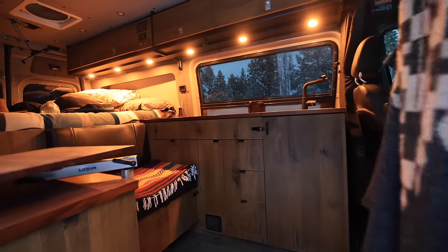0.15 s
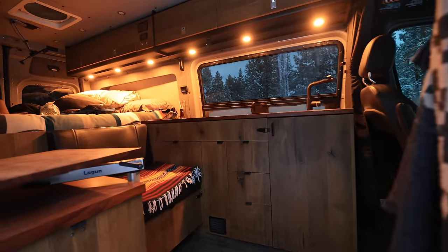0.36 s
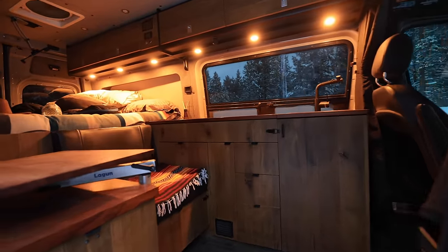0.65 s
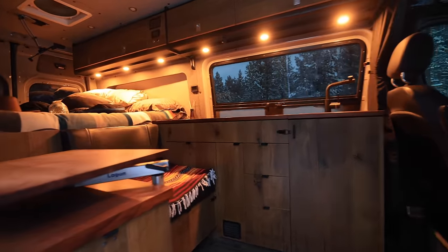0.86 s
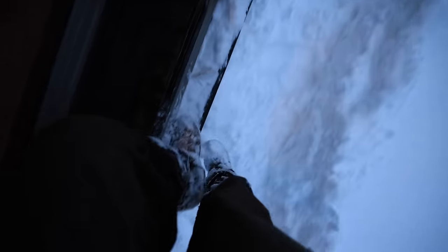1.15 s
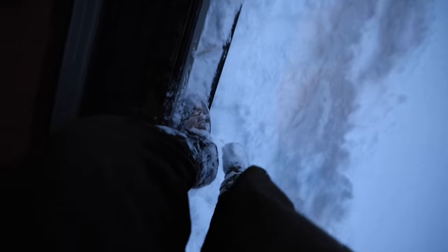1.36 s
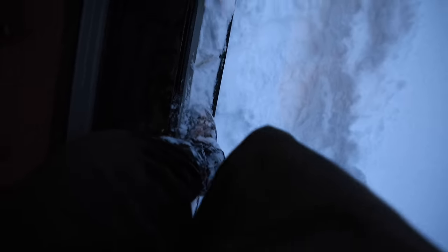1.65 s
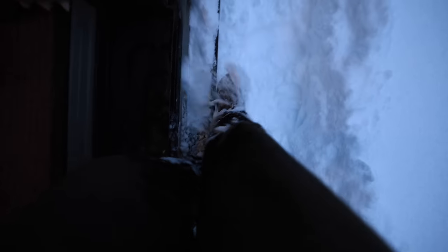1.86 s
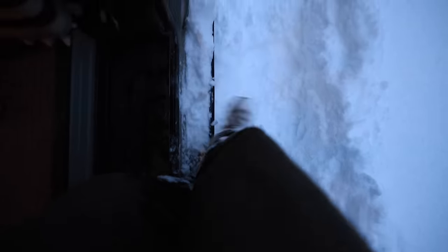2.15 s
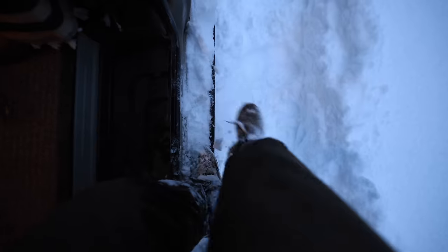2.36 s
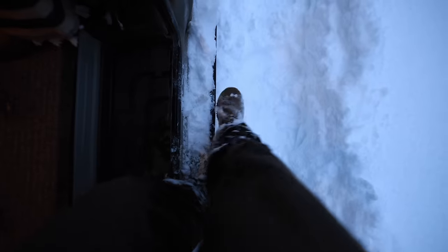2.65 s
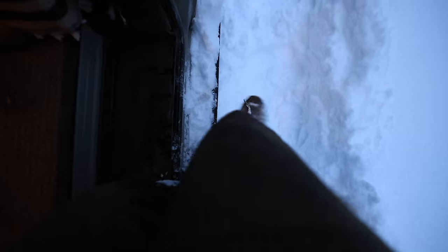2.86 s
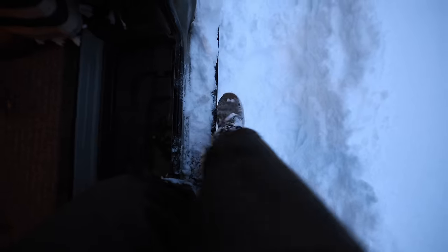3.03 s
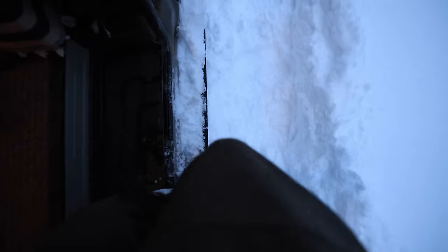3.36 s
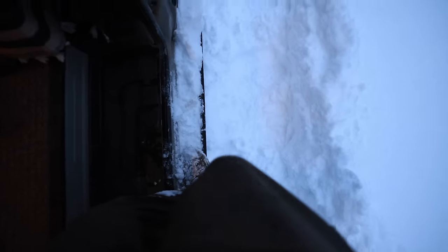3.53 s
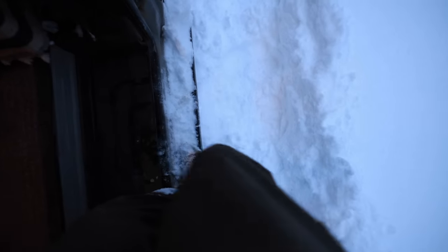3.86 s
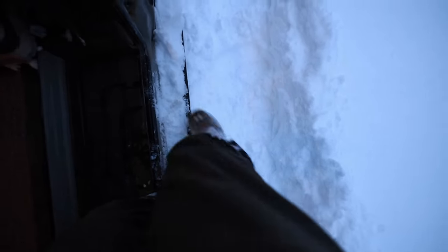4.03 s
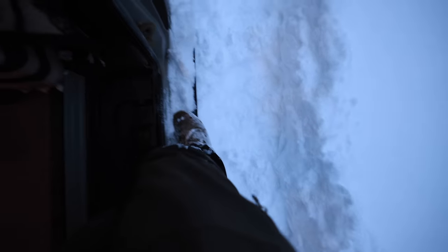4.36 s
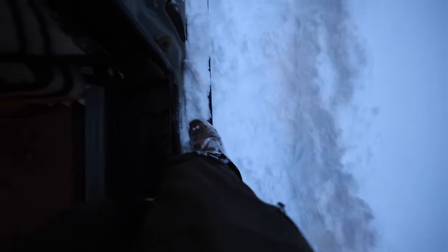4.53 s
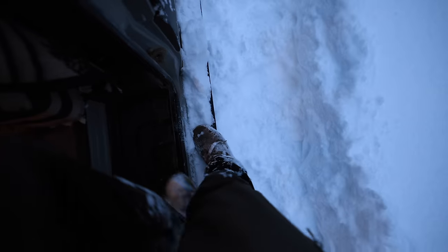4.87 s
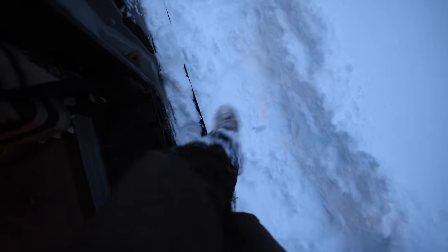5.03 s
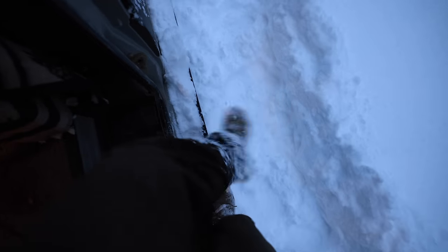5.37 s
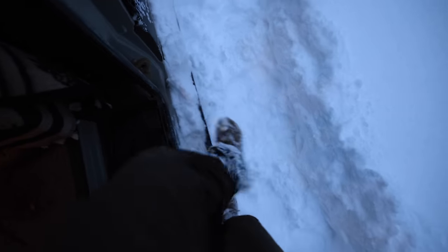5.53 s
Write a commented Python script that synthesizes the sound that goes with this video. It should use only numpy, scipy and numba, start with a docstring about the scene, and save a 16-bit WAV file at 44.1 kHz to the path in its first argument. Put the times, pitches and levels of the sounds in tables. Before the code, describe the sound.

The sound is close, in the open doorway of a quiet camper van. For the first 1.7 seconds stiff trousers rustle over a few soft, dull footfalls and faint low booms of the van body. At about 1.9, 2.2, 2.6 and 3.0 seconds a boot knocks hard against the hollow step, each blow a clack and a ringing thud with a little crunch of snow. The hardest knocks slightly overload the microphone and briefly duck everything else. Lighter footfalls land on the step around 3.5 to 3.7 seconds, then clunk on the cabin floor from 4.2 to 4.5. The other boot knocks twice, at 5.1 and 5.5 seconds. Trousers swish with each leg swing, and between blows come scattering snow crumbs, light taps on the trim and tiny tinkles of a zip pull. Low handling rumble and soft cabin air with a faint fan-like whine continue throughout.

```python
"""The open doorway of a camper van, heard from close by on the microphone of a hand-held camera.
Someone knocks a snowy boot against the step, steps up and knocks the other. Each blow rings the hollow
step or the cabin floor and crushes snow; stiff trousers swish with every swing of a leg. Behind them are
taps on the trim, a zip pull, soft booms of the van body, handling rumble and the air of the quiet cabin.
At this distance the hardest knocks overload the camera, and its limiter ducks everything for a moment."""
import sys
import numpy as np
from scipy import signal
from scipy.fft import rfft, irfft
from scipy.io import wavfile
from numba import njit

SR = 44100
rng = np.random.default_rng(int(sys.argv[2]) if len(sys.argv) > 2 else 0)


def wrap_up_sound(samples):
    """Save the sound to the file named by the first command line argument, as 16-bit audio."""
    columns = np.atleast_2d(samples).T
    # keep every value between -1 and 1, then stretch to whole-number steps
    tamed = np.clip(columns, -1, 1)
    steps = np.round(tamed * 32767).astype(np.int16)
    wavfile.write(sys.argv[1], SR, steps)


N = 251370
TIME = np.arange(N) / SR
AGE = TIME[:SR // 2]  # time since a blow, s

# Kicks against the step, close to the microphone; the lowest mode is stronger towards mid span:
# strike_s, sole_lead_s, sole_force_db, crunch_db, strike_force_db, lowest_mode_db,
# clack_lead_s, clack_db, low_clack_hz, high_clack_hz, high_over_low_db
KICKS = [(1.8582, 0.0039, -29, -33, 7, 2.5, 0.00037, 9, 805, 2200, 2),
         (2.2489, .0255, -6, -24, 5, 14, 0.0018, 1, 756, 2290, 0.5),
         (2.6226, .0318, 4, -18, 7.5, 9, 0.00053, 13, 807, 1940, -3),
         (2.9788, .0133, 5, -27, 2.5, -2.5, 0.00029, 0.5, 925, 1950, 4.5),
         (5.1099, 0.032, 0.5, -26, 0, -2, .0015, -11, 676, 2570, -4.5),
         (5.4685, 0.003, -6.5, -30, 7.5, 0.5, 0.00094, 2.5, 575, 2117, 4.5)]
def kick_contacts(sole_hz=139, edge_hz=750, slip_db=-14, slip_crunch_db=-5, edge_crunch_db=0.5):
    """The cushioned sole lands softly, slips and catches again halfway, and then the hard edge strikes."""
    contacts = []
    for strike_s, lead_s, sole_db, crunch_db, force_db, lowest_db, *_ in KICKS:
        bend_db = lowest_db + 0.5  # the flat sole bends the step more than the edge does
        touch = (strike_s - lead_s, sole_db, sole_hz, bend_db, crunch_db)
        catch = (strike_s - lead_s / 2, sole_db + slip_db, sole_hz, bend_db, crunch_db + slip_crunch_db)
        strike = (strike_s, force_db, edge_hz, lowest_db, crunch_db + edge_crunch_db)
        contacts += [touch, catch, strike]
    return contacts


# The stiff boot sole: pitch_hz, level_db, t60_s
SOLE_MODES = [(191, -10, 0.099), (355, -13, 0.05), (1070, -9, 0.012), (3110, -11, 0.011),
              (5110, -19, 0.0086), (7900, -34, 0.019)]
def sole_clacks(low_db=-2):
    """The sole thuds and clacks just before the step gives; the clack's colour depends on where it lands."""
    out = np.zeros(N)
    for strike_s, *_, lead_s, clack_db, low_hz, high_hz, high_over_low_db in KICKS:
        clack_modes = [(low_hz, low_db, .014), (high_hz, low_db + high_over_low_db, .008)]
        add(out, strike_s - lead_s, -undb(clack_db) * ring(SOLE_MODES + clack_modes, wave=np.sin))
    return out


# The hollow step in the doorway: pitch_hz, level_db, t60_s
STEP_MODES = [(105.8, -20, 0.19), (135.7, -3, 0.032), (188, -11.5, 0.065), (206.7, -20, 0.04),
              (235.7, -23.5, 0.42), (235.5, -21, 0.34), (252.7, -12, 0.23), (292, -44, 0.32),
              (332.4, -17, 0.13), (420, -33.5, 0.4), (530, -16.5, 0.061), (816, -10.5, 0.0057)]
# Footfalls on it: start_s, heel_force_db, contact_hz, lowest_mode_db, crunch_db
STEP_TREADS = [(0.415, -24.5, 200, -7, -61), (0.440, -23.5, 250, 25, -52), (0.546, -24, 400, -5, -59),
               (1.308, -28.5, 510, -8, -40), (1.626, -30.5, 486, 0, -38.5), (3.4502, -8.5, 760, 0, -24.5),
               (3.480, -14, 288, -10, -45), (3.6315, -15, 440, 3, -60), (3.6805, -6.5, 330, -10, -38.5),
               (3.712, -13, 230, -12, -39.5), (5.129, -1.5, 357, 13, -28.5)]
def door_step():
    """The hollow step rings under kicks and footfalls."""
    treads = footfalls(STEP_TREADS, lag_s=.006, weight_db=5.5, weight_hz=293, bend_db=-4.5, crush_db=-3)
    return blows(kick_contacts() + treads, STEP_MODES, panel_db=-9.5, panel_t60=0.19, crunch_t60=0.22,
                 low_hz=84, top_hz=2950)


# The cabin floor, just inside the door: pitch_hz, level_db, t60_s
FLOOR_MODES = [(94, -6, 0.1), (153, -39, .06), (231, -12.5, 0.18), (296.3, -11, 0.1), (339, -12, 0.032),
               (389, -13.5, 0.041), (510, -28, 0.037), (566, -15.5, 0.071), (710, -17.5, 0.081),
               (1125, -7.5, 0.03), (1545, -14.5, 0.03)]
# Footfalls on floor and sill: start_s, heel_force_db, contact_hz, lowest_mode_db, crunch_db
FLOOR_TREADS = [(0.110, -9, 333, -2, -51), (0.675, -25.5, 700, -15, -34.5), (1.025, -28.5, 700, -17, -36.5),
                (4.241, -12.5, 350, -1, -30.5), (4.289, -13, 503, -14, -27), (4.314, -10.5, 695, -16, -47),
                (4.3445, -9, 1160, -7.5, -31), (4.4551, 0, 1690, -8.5, -29), (4.4755, -7.5, 350, 3, -52)]
def cabin_floor():
    """The floor answers each footfall with a shorter ring than the step."""
    treads = footfalls(FLOOR_TREADS, lag_s=.0059, weight_db=-1.5, weight_hz=490, bend_db=-12, crush_db=-6)
    return blows(treads, FLOOR_MODES, panel_db=-2.5, panel_t60=0.022, crunch_t60=0.16,
                 low_hz=45, top_hz=1930)


def footfalls(treads, lag_s, weight_db, weight_hz, bend_db, crush_db):
    """Two contacts a tread: the heel touches, then the weight follows dully and crushes the snow again, more
    softly."""
    contacts = []
    for start_s, force_db, contact_hz, lowest_db, crunch_db in treads:
        heel = (start_s, force_db, contact_hz, lowest_db, crunch_db)
        weight = (start_s + lag_s, force_db + weight_db, weight_hz, lowest_db + bend_db, crunch_db + crush_db)
        contacts += [heel, weight]
    return contacts


# Dull spectrum of the panels round the doorway, also of flapping cloth: frequency_hz, density_db
DULL_SPECTRUM = [(70, -25), (110, 4.5), (250, 13), (400, -8.5), (700, -20), (1500, -38.5), (4000, -66)]
# Spectrum of snow crushed underfoot, also of snapping creases: frequency_hz, density_db
CRUNCH_SPECTRUM = [(300, 6), (1000, 4), (2200, -3.5), (3700, -9), (5000, -22.5), (8000, -29), (16000, -44)]
def blows(contacts, modes, panel_db, panel_t60, crunch_t60, low_hz, top_hz):
    """A boot pushes on a body: its modes and the panels round it ring while snow crumbles underfoot."""
    out = np.zeros(N)
    lowest, upper = ring(modes[:1]), ring(modes[1:])
    # the body is too small to radiate deep bass and too damped to carry treble
    bass_cut = signal.butter(2, low_hz, "highpass", fs=SR, output="sos")
    treble_cut = signal.butter(4, top_hz, fs=SR, output="sos")
    for start_s, force_db, contact_hz, lowest_db, crunch_db in contacts:
        panels = colour(rng.standard_normal(len(AGE)), DULL_SPECTRUM) * fade(panel_t60)
        body = undb(lowest_db) * lowest + upper + undb(panel_db) * panels
        # a softer contact pushes for longer and wakes only the low modes
        softness = signal.butter(2, contact_hz, fs=SR, output="sos")
        thud = signal.sosfilt(np.vstack([softness, bass_cut, treble_cut]), body)
        add(out, start_s, -undb(force_db) * thud)
        crunch = colour(grains(len(AGE), per_s=5200, spread_db=-1.0), CRUNCH_SPECTRUM)
        add(out, start_s, undb(crunch_db) * crunch * fade(crunch_t60))
    return out


# Snow coming off the boots: start_s, relative_level_db, t60_s
CRUMBS = [(1.6288, -29, 0.035), (2.1857, -35, 0.04), (2.3411, -48, 0.032), (2.3616, -33, 0.025),
          (2.8702, -29.5, 0.03), (2.8828, -31, 0.035), (3.68, -26.5, 0.05), (3.7311, -31.5, 0.035),
          (3.999, -36, 0.035), (4.0317, -31, 0.035), (5.5456, -23, 0.033), (5.6481, -33, 0.03)]
# Its icy spectrum: frequency_hz, density_db
CRUMB_SPECTRUM = [(300, 2), (1500, 10), (3500, 6), (7000, -7), (10000, -12.5), (16000, -28)]
def snow_crumbs(gain_db=-8):
    """Crumbs of snow break off and scatter in short bright bursts of grains."""
    out = np.zeros(N)
    for start_s, level_db, t60 in CRUMBS:
        grit = colour(grains(len(AGE), per_s=5200, spread_db=4.0), CRUMB_SPECTRUM)
        add(out, start_s, undb(level_db + gain_db) * grit * fade(t60))
    return out


# One trouser leg brushing the other, near the microphone; tight fabric hisses more:
# start_s, length_s, level_db, growth_db, extra_hiss_db
STROKES = [(0.0, 1.2, -43.5, -2.5, 4), (0.334, 0.24, -38.5, -11, -5.5), (0.537, 0.13, -37, -9.5, 1),
           (0.867, 0.038, -39, -9, 6), (0.928, 0.19, -39.5, -4.5, 1), (1.028, 0.071, -49, -7, 11),
           (1.752, 0.084, -30, 1.5, 3.5), (1.831, .04, -20.5, -1.5, 1.5), (2.044, 0.34, -49, 4, -3),
           (2.749, 0.027, -36.5, 4.5, -6), (3.233, .14, -31.5, -2.5, -0.5), (3.365, .19, -43, -9, 3.5),
           (4.235, 0.049, -42.5, -14, 7), (4.62, 0.146, -34.5, 1, 5), (4.781, 0.14, -31, -8.5, 5),
           (5.002, 0.013, -30.5, -5.5, -3.5), (5.069, 0.045, -28, 6, 5), (5.167, 0.052, -32, -5, 3.5),
           (5.238, 0.025, -27.5, 3.5, -3.5), (5.312, 0.36, -43, 1, -5.5)]
def leg_strokes(idle_db, idle_hiss_db=1, attack_s=0.054, release_s=0.017):
    """Level and extra hiss of the cloth in dB: a stroke sets in, follows the leg's speed and lets go."""
    power = np.full(N, undb(idle_db) ** 2)  # the cloth is never quite still
    weighted_hiss = power * idle_hiss_db
    for start_s, length_s, level_db, growth_db, hiss_db in STROKES:
        onset = np.interp(TIME, [start_s - attack_s / 2, start_s + attack_s / 2], [0, 1])
        release = np.exp(-np.maximum(TIME - start_s - length_s, 0) / release_s)
        progress = np.clip((TIME - start_s) / length_s, 0, 1)
        stroke_power = (onset * release * undb(level_db + growth_db * (progress - .5))) ** 2
        power += stroke_power
        weighted_hiss += stroke_power * hiss_db
    return 10 * np.log10(power), weighted_hiss / power


# Stiff fabric rubbing at close range: frequency_hz, density_db
CLOTH_SPECTRUM = [(80, -7.5), (160, -10), (400, 4.5), (800, -1), (1300, -1.5), (2000, -5), (2800, -8),
                  (3700, -10), (4800, -20), (8000, -27), (11000, -32.5), (16000, -34.5)]
def trousers(idle_db=-49.5, flutter_db=1.5, flap_db=-27, crease_db=-16, rasp_hz=1780, rasp_octaves=1.17):
    """Stiff fabric rubs in dense little slips; its folds shift the colour, flap dully and at times snap."""
    stroke_db, hiss_db = leg_strokes(idle_db)
    rub_db = stroke_db + flutter_db * drift(130)
    rasp_db = 0.1733 * (stroke_db - idle_db)  # the harder the stroke, the more it gathers in a rasp
    slips = colour(grains(N, per_s=9000, spread_db=-1.5), CLOTH_SPECTRUM)
    spectrum = rfft(slips)
    hz = np.maximum(np.fft.rfftfreq(N, 1 / SR), 1)
    swish = np.zeros(N)
    for centre_hz in 125 * 2 ** np.arange(0, 7.5, 1 / 3):  # third-octave bands
        triangle = np.maximum(1 - 3 * np.abs(np.log2(hz / centre_hz)), 0)
        band = irfft(spectrum * triangle, N)
        fold_db = (2.6 if centre_hz < 3000 else 1.6) * drift(40)
        rasp_shape = np.exp(-(np.log2(centre_hz / rasp_hz) / rasp_octaves) ** 2) - .5
        hiss_shape = min(centre_hz / 6000, 1)
        swish += band * undb(fold_db + rasp_db * rasp_shape + hiss_db * hiss_shape)
    creases = colour(grains(N, per_s=45, spread_db=2.5), CRUNCH_SPECTRUM)
    # the dull flapping grows more slowly with speed than the swish does
    flap = undb(flap_db + 0.79 * rub_db) * colour(rng.standard_normal(N), DULL_SPECTRUM)
    return undb(rub_db) * (swish + undb(crease_db) * creases) + flap


# A boot touching the trim: start_s, level_db
TRIM_TAPS = [(1.627, -29.5), (2.537, -35), (2.5612, -20), (2.9534, -18.5), (4.548, -24), (4.551, -22),
             (5.0, -30.5), (5.515, -37), (5.547, -30)]
# The trim panel: pitch_hz, level_db, t60_s
TRIM_MODES = [(412, -13, 0.036), (926, 2, 0.011), (1230, 4, 0.0055), (2240, -14.5, 0.034)]
def trim_taps():
    """The trim panel ticks under light taps of a boot."""
    return ticks(TRIM_TAPS, TRIM_MODES, vary_db=.7)


# Tinkles of a zip pull: start_s, level_db
ZIP_TINKLES = [(2.558, -42.5), (2.955, -46), (2.966, -34), (3.095, -58), (3.21, -55), (3.392, -40),
               (5.108, -26)]
# The pull itself: pitch_hz, level_db, t60_s
ZIP_MODES = [(5700, -27, 0.021), (7320, -0.5, 0.017), (9700, -5, 0.015), (10200, -15.5, 0.011),
             (11900, -20, 0.021)]
def zip_pull():
    """The small hard pull rings high and briefly."""
    return ticks(ZIP_TINKLES, ZIP_MODES, vary_db=2)


# Soft booms of the van as the weight shifts: middle_s, level_db, pitch_hz
BOOMS = [(0.01, -26, 60.3), (0.758, -26, 44.5), (0.87, -26, 51), (1.188, -29, 56.3), (2.119, -31, 54.3),
         (5.05, -30, 62)]
def van_booms(length_s=0.1287):
    """The van body swells for a few slow cycles under a shifting load."""
    out, t = np.zeros(N), TIME[:int(length_s * SR)]
    swell = np.sin(np.pi * t / length_s) ** 2
    for middle_s, level_db, pitch_hz in BOOMS:
        add(out, middle_s - length_s / 2, undb(level_db) * swell * np.sin(2 * np.pi * pitch_hz * t))
    return out


# Handling noise, right at the microphone: time_s, relative_level_db
RUMBLE_LEVELS = [(0.0, -38.5), (0.76, -38), (0.98, -43.5), (2.52, -45), (3.76, -48.5), (5.7, -41.5)]
# Its spectrum: frequency_hz, density_db
RUMBLE_SPECTRUM = [(15, -3), (32, -11.5), (52, 5), (75, -2), (110, -6.5), (200, -7), (600, -49)]
def handling(gain_db=3):
    """The camera rumbles low in the hand."""
    level_db = gain_db + np.interp(TIME, *np.transpose(RUMBLE_LEVELS))
    return undb(level_db) * colour(rng.standard_normal(N), RUMBLE_SPECTRUM, size=8192)


# Room tone of the cabin, in the background: frequency_hz, density_db
CABIN_SPECTRUM = [(25, -25), (55, -8), (110, -20), (250, -7.5), (500, -11), (1000, -13.5), (2000, -25),
                  (3600, -22.5), (5000, -33), (10000, -44), (16000, -50)]
def cabin_air(air_db=-48, swell_db=-6.5, whine_hz=752, whine_db=-54.5):
    """Quiet air swells and sinks behind a faint whine, as of a small fan."""
    air = unit(colour(rng.standard_normal(N), CABIN_SPECTRUM, size=8192))
    air *= undb(air_db + swell_db * drift(5.5))
    pitch_hz = whine_hz + 0.42 * drift(32)
    whine = np.sin(2 * np.pi * np.cumsum(pitch_hz) / SR)
    return air + undb(whine_db) * unit(whine)


def undb(db):
    """Decibels to gain."""
    return 10 ** (np.asarray(db) / 20)


def unit(x):
    """Scale to rms 1."""
    return x / np.sqrt(np.mean(x ** 2))


def add(out, start_s, x):
    """Mix x into out from start_s on."""
    i = int(round(start_s * SR))
    x, i = x[max(-i, 0):], max(i, 0)
    out[i:i + len(x)] += x[:len(out) - i]


def colour(x, points, size=2048):
    """Filter x by a causal response of unit energy, shaped by (frequency_hz, density_db) points."""
    hz, db = np.transpose(points)
    bins_hz = np.maximum(np.fft.rfftfreq(size, 1 / SR), 1)
    gain = undb(np.interp(np.log(bins_hz), np.log(hz), db))
    cepstrum = irfft(np.log(gain))
    cepstrum[1:size // 2] *= 2  # fold onto positive time for minimum phase
    cepstrum[size // 2 + 1:] = 0
    response = irfft(np.exp(rfft(cepstrum)))
    return signal.fftconvolve(x, response / np.linalg.norm(response))[:len(x)]


def fade(t60):
    """Exponential decay after a blow, by 60 dB in t60 seconds."""
    return np.exp(-np.log(1000) * AGE / t60)


def ring(modes, wave=np.cos):
    """Free vibration of a struck body."""
    return sum(undb(db) * fade(t60) * wave(2 * np.pi * hz * AGE) for hz, db, t60 in modes)


def ticks(hits, modes, vary_db):
    """Light hits on a hard object; each one wakes its modes in a different mix."""
    out = np.zeros(N)
    for start_s, level_db in hits:
        mix = [(hz, db + vary_db * rng.standard_normal(), t60) for hz, db, t60 in modes]
        add(out, start_s, undb(level_db) * ring(mix, wave=np.sin))
    return out


def drift(rate_hz):
    """Smooth random drift with a spread near 1."""
    knots = rng.standard_normal(N // 100)
    return np.interp(TIME * rate_hz, np.arange(len(knots)), knots)


def grains(size, per_s, spread_db):
    """Random tiny slips or fractures of uneven strength."""
    hit = rng.random(size) < per_s / SR
    strength = undb(spread_db * np.minimum(rng.exponential(size=size), 4))
    return unit(hit * strength * rng.standard_normal(size))


@njit
def follow(x, attack, release):
    """Envelope that rises fast and sinks slowly."""
    out, level = np.empty(len(x)), 0.
    for i in range(len(x)):
        level += (x[i] - level) * (attack if x[i] > level else release)
        out[i] = level
    return out


def scene():
    """Boots, clothes and cabin at one close microphone."""
    boots = door_step() + cabin_floor() + sole_clacks()
    movement = trim_taps() + zip_pull() + snow_crumbs() + van_booms() + trousers()
    return (boots + movement + handling() + cabin_air())[None]


def record(dry, limit_db=-5, attack_s=0.0046, release_s=0.18, top_hz=15900):
    """The camera's limiter is too slow for the close knocks, which overload it, and ducks what follows."""
    envelope = follow(np.abs(dry[0]), 1 / (attack_s * SR), 1 / (release_s * SR))
    ducked = dry / np.maximum(envelope / undb(limit_db), 1)
    clipped = ducked / (1 + ducked ** 6) ** (1 / 6)
    treble_cut = signal.ellip(8, .2, 70, top_hz, fs=SR, output="sos")
    return signal.sosfilt(treble_cut, clipped)


dry = scene()
out = record(dry)
wrap_up_sound(out)
```